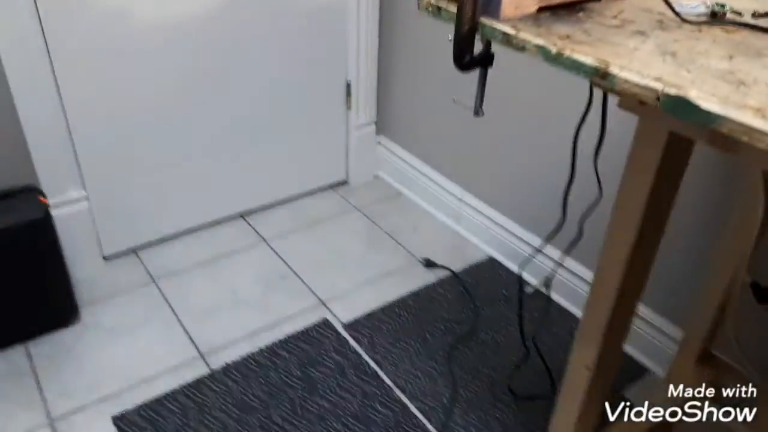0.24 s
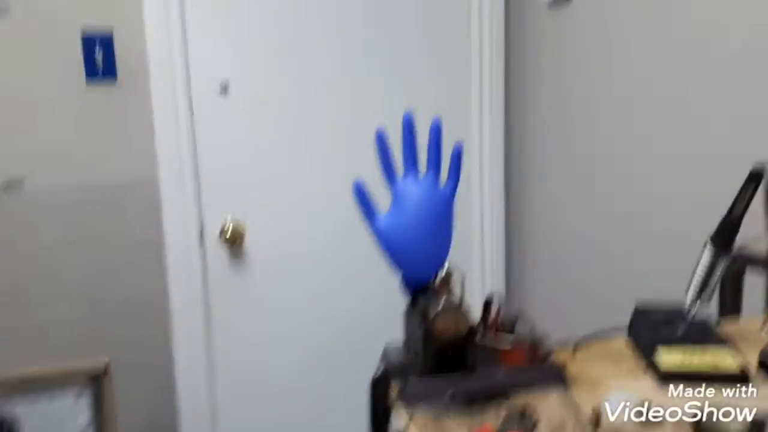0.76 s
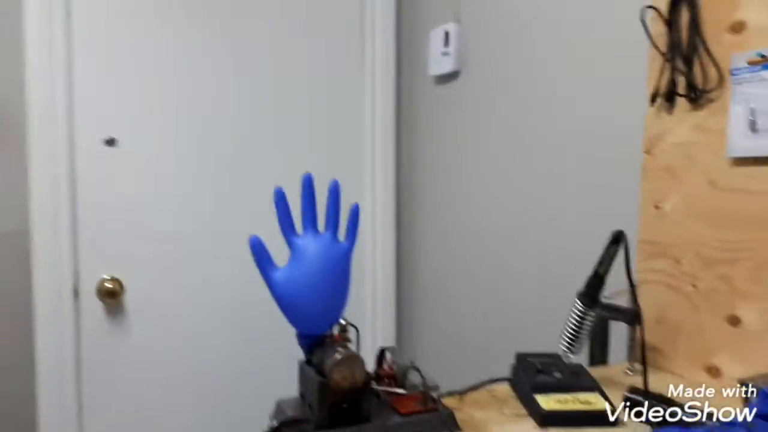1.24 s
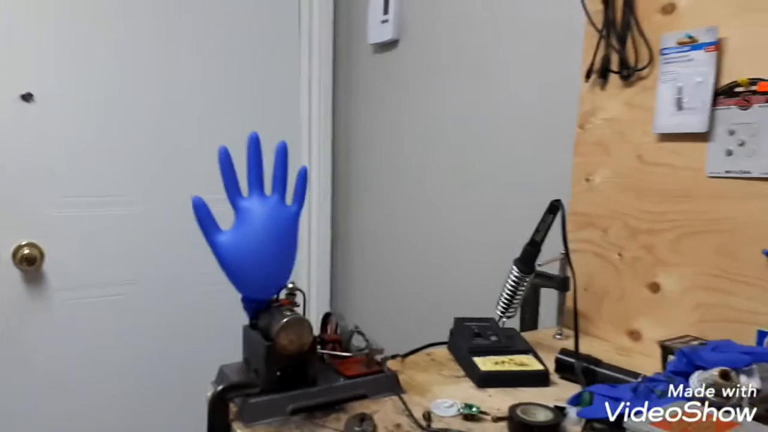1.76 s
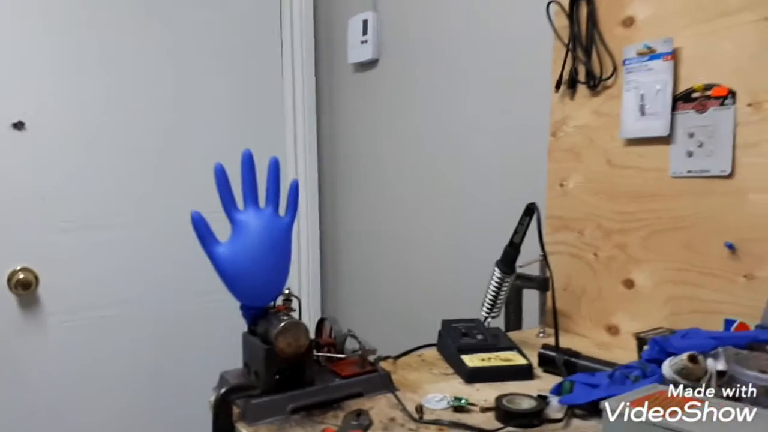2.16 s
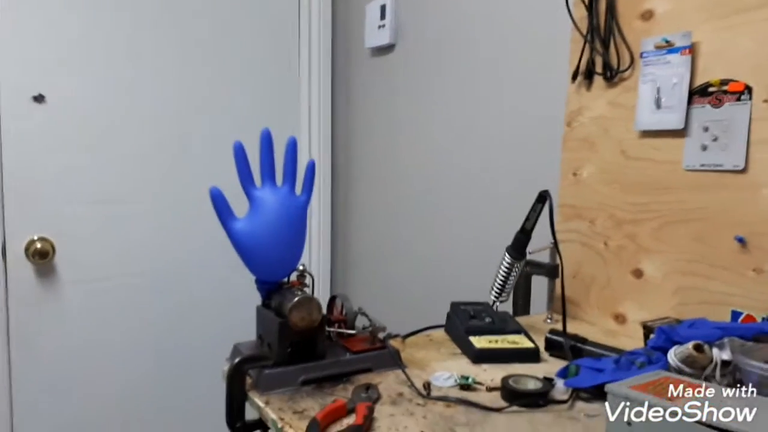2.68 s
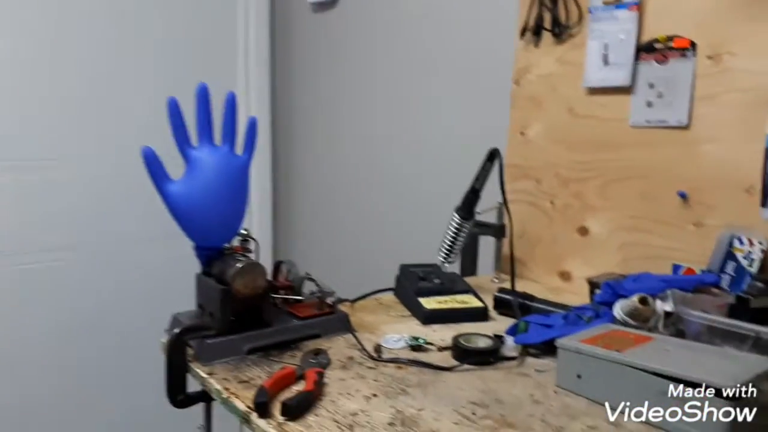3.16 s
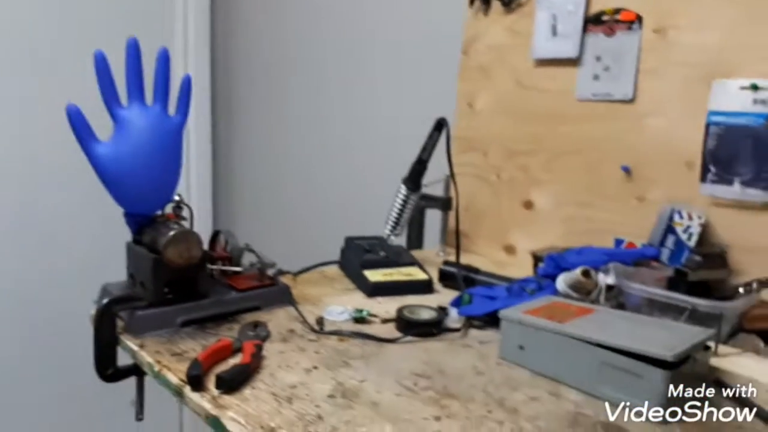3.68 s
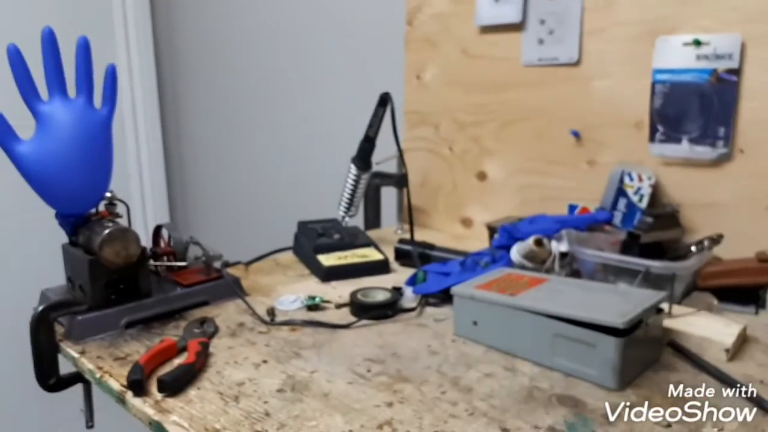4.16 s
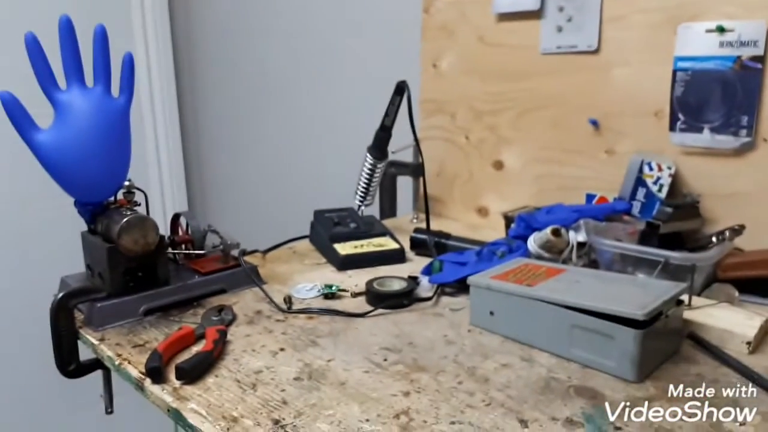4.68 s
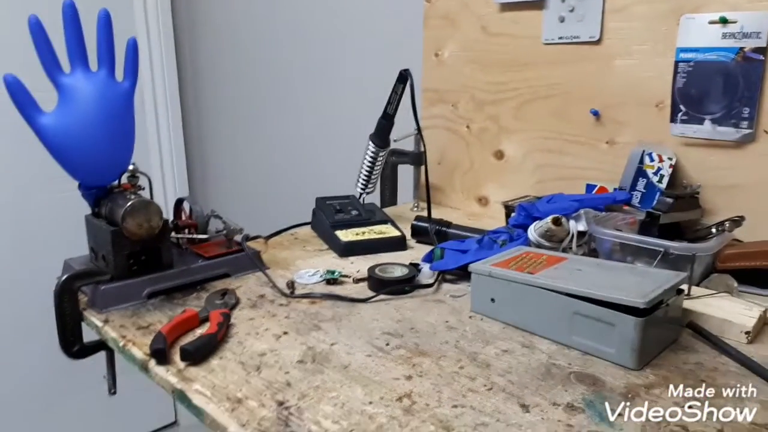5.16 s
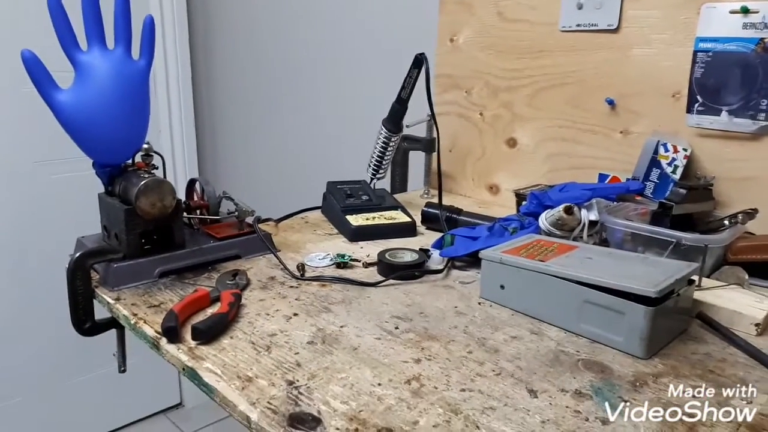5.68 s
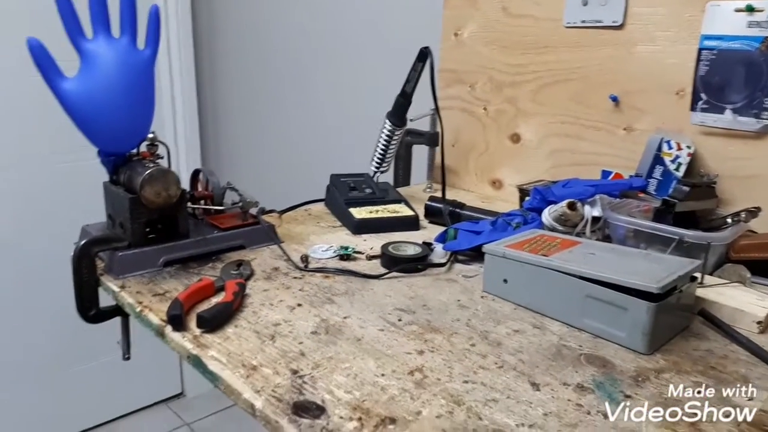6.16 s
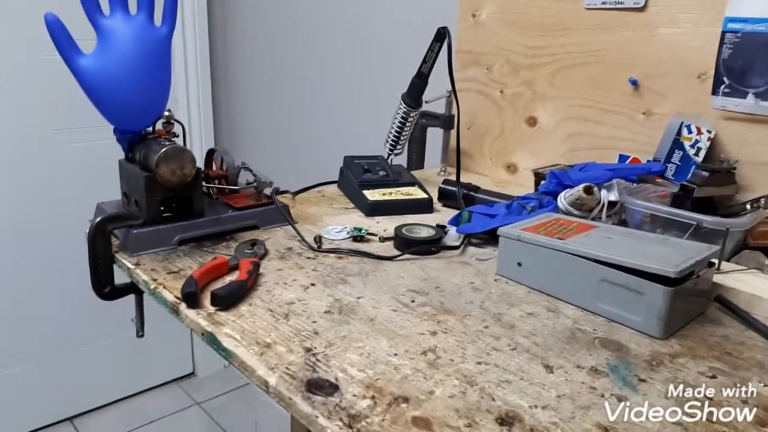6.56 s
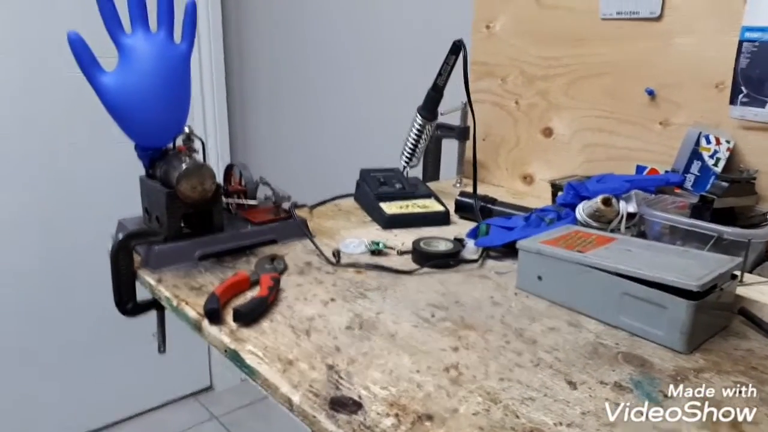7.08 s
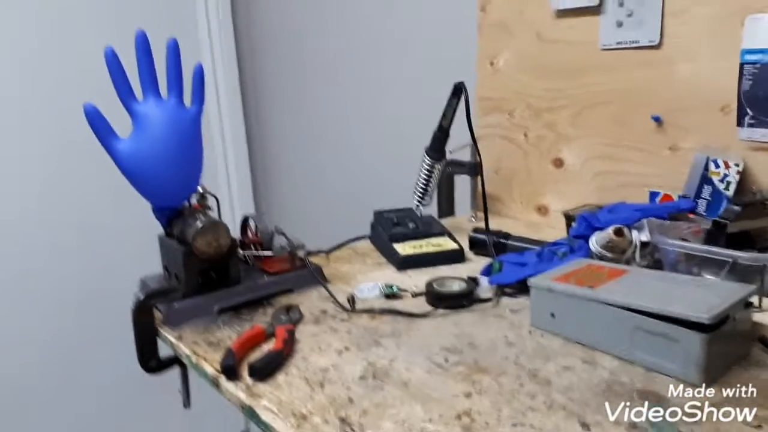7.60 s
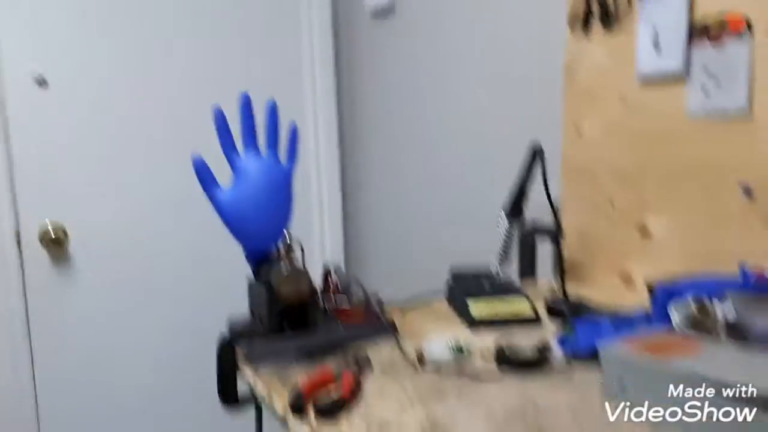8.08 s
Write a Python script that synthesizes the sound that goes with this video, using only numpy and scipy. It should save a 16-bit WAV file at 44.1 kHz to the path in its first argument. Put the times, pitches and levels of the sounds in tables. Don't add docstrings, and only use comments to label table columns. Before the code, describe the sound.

Close handheld stereo in a small workshop with a faint hum. A thin hiss stops, a tool clatters on the bench, and a flint striker rasps once with small metal ticks. After a quiet gap, gas rushes out in a bright steady hiss. Repeated strokes snap over it, one briefly puffing into flame; the torch finally lights and roars unevenly, with loud hard knocks on the bench near the end.

```python
import sys
import numpy as np
from scipy import signal
from scipy.fft import rfft, irfft, next_fast_len
from scipy.io import wavfile
from scipy.ndimage import uniform_filter1d

SR = 44100
rng = np.random.default_rng(int(sys.argv[2]) if len(sys.argv) > 2 else 0)


def ratio(d):
    e = np.asarray(d, float) / 20
    return 10 ** e


def pcm_store(signal):
    levels = np.round(np.clip(np.atleast_2d(signal), -1, 1) * 32767)
    wavfile.write(sys.argv[1], SR, levels.astype(np.int16).T)


N = 367353
LAG = 17


def rms_one(x):
    return x / np.sqrt(np.mean(np.mean(np.atleast_2d(x), axis=0) ** 2) + 1e-20)


def in_time(tables):
    rows = []
    for table in tables:
        silence = [-130] * (len(table[0]) - 1)
        rows += [[table[0][0] - .006, *silence], *table, [table[-1][0] + .006, *silence]]
    s, *columns = np.transpose(rows)
    return [np.interp(np.arange(N) / SR, s, column) for column in columns]


def ramp(span_s):
    return np.interp(np.arange(N) / SR, span_s, [0, 1])


def summed(*levels_db):
    return 10 * np.log10(sum(ratio(2 * db) for db in levels_db))


def at_hz(points, hz):
    points_hz, points_db = np.transpose(points)
    return np.interp(np.log(hz + 1), np.log(points_hz + 1), points_db)


def drift(rate_hz):
    r = np.exp(-80 * np.pi * rate_hz / SR)
    slow = signal.lfilter([1], [1, -2 * r, r * r], rng.standard_normal(N // 40 + 2002))[2000:]
    return np.interp(np.arange(N) / 40, np.arange(len(slow)), rms_one(slow))


def filtered(x, order, edges_hz, kind):
    return signal.sosfilt(signal.butter(order, edges_hz, kind, fs=SR, output="sos"), x)


def pan(left_right_db):
    return ratio([[left_right_db / 2], [-left_right_db / 2]])


def decays(times_s, gains, t60s, rises_s):
    out = np.zeros(N)
    for s, gain, t60, rise in zip(*np.broadcast_arrays(times_s, gains, t60s, rises_s)):
        at = np.arange(max(round((s - 6 * rise) * SR), 0), min(round((s + 1.5 * t60) * SR), N))
        t = at / SR - s
        swell = np.exp(np.minimum(t, 0) / max(rise, 1e-4))
        out[at] += (gain * np.where(t < 0, swell, ratio(-60 * t / t60))) ** 2
    return np.sqrt(out)


def clicks_at(times_s, gains):
    out = np.zeros(N)
    np.add.at(out, np.round(np.asarray(times_s) * SR).astype(int), gains)
    return out


def ring(clicks, hz, t60):
    r, w = ratio(-60 / (t60 * SR)), 2 * np.pi * hz / SR
    return signal.lfilter([0, np.sin(w)], [1, -2 * r * np.cos(w), r * r], clicks + 1e-18)


def heard(spectrum, ports, alike, grain_db=0.0, peaks=(), split_hz=(), same_hz=400, echo_s=.1, order=12):
    size = next_fast_len(N // 2 + 1)
    hz = np.arange(size // 2 + 1) * SR / size
    noise = rng.standard_normal(size)
    source = rfft(noise * ratio(grain_db * np.minimum(rng.exponential(1, size), 5)))

    echoes = rng.standard_normal((2, SR // 4)) * ratio(-60 * np.arange(SR // 4) / SR / echo_s)
    echoes = rfft(echoes / np.sqrt(np.sum(echoes ** 2, axis=1, keepdims=True)), size)
    still = .3 + .2 / (1 + (hz / 1500) ** 2)
    blur = np.exp(2j * np.pi * rng.random((2, len(hz))))
    echoes = np.sqrt(still) * echoes + np.sqrt(1 - still) * blur

    share = np.clip(alike + (1 - alike) / (1 + (hz / same_hz) ** 2), 0, 1)
    late = np.exp(-2j * np.pi * hz * LAG / SR / (1 + (500 / (hz + 1)) ** 2))
    direct = np.array([late, np.ones(len(hz))])

    tilt_db = at_hz(ports, hz) / 2
    colour_db = at_hz(spectrum, hz)
    for centre_hz, width_hz, db in peaks:
        colour_db = colour_db + db / (1 + (2 * (hz - centre_hz) / width_hz) ** 2)
    colour = (hz > spectrum[0][0]) * ratio(colour_db + np.array([tilt_db, -tilt_db]))
    colour = colour / np.hypot(ratio(tilt_db), ratio(-tilt_db))

    pair = source * colour * (np.sqrt(share) * direct + np.sqrt(1 - share) * echoes)
    below = [0] + [1 / (1 + (hz / edge) ** order) for edge in split_hz] + [1]
    bands = [rms_one(irfft(pair * (high - low), size)) for low, high in zip(below, below[1:])]
    return [np.tile(band, 2)[:, :N] for band in bands]


# catch in s, peak in s, peak in dB, dying in dB per s.
WHOOMPS = [
    (4.602, 4.673, -22, 297),
    (6.658, 6.67, -25, 348),
    (7.803, 8.7, -39, 147),
]


def whoomps_db():
    bursts_db = []
    for catch, peak, db, dying in WHOOMPS:
        held = peak + 0.21 * (peak - catch)
        points = [(catch - 0.016, db - 44), (catch, db - 9), (peak, db), (held, db), (held + 50 / dying, db - 64)]
        bursts_db += in_time([points])
    return summed(*bursts_db)


# time in s, flow in dB.
LEAK_FLOW = [(0.0, -59), (0.03, -58), (0.17, -62.5), (0.33, -62)]
GAS_FLOW = [(3.57, -100), (3.619, -66), (3.71, -45.5), (3.8, -48), (3.9, -43), (4.1, -41), (4.3, -40),
            (4.801, -39.5), (5.48, -39.5), (5.76, -40.5), (6.0, -43), (6.53, -44.5), (6.66, -42)]
# time in s, flow in dB, top in dB against it as the nozzle turns away.
LIT_FLOW = [(6.66, -41, -4), (6.8, -47.5, -0.5), (7.1, -45, 0.5), (7.4, -43, -4), (7.55, -48.5, 0.5),
            (7.79, -48, -6.5), (8.07, -49, -6), (8.33, -52.5, 2)]
# frequency in Hz, level in dB per Hz.
LEAK_JET = [(1530, -69), (2600, -32), (3600, -24), (4300, -2), (4940, -10), (6220, -9), (6780, 3),
            (7100, 7.5), (8680, -20.5), (12700, -7.5), (14100, -30), (16000, -24), (16500, -51)]
COLD_JET = [(1530, -59), (2600, -25.5), (3130, -20.5), (3430, -20.5), (4260, -8.5), (5010, -6.5),
            (5590, -14.0), (5990, -12.0), (7210, 2.0), (8610, -23.5), (12400, -7.5), (13800, -21.0),
            (15200, -16.0), (16100, -29.5), (16500, -37.0)][1:]
LIT_JET = [(2060, -63.5), (3500, -16), (3900, -10), (4200, -4), (4930, 0.5), (5650, -8), (6030, -4.5),
           (6870, -1), (8230, -14), (9130, -7.5), (10400, -18), (11500, -8), (12400, -8.5), (15600, -17.5),
           (16200, -24), (16500, -44.5)]
# frequency in Hz, width in Hz, level in dB.
WHISTLES = [(4395, 89, 7), (12900, 300, 4.5)]
# level in dB at full flow, share of the flow's swing.
LEAK_RIDGES = [
    (-49, 0.76),
    (-41.5, 1.12),
]
RIDGES = [
    (-48, 0.6),
    (-42, 1.2),
    (-46, 0.84),
]
# frequency in Hz, left-right in dB.
PORTS_NEAR = [(60, -1.0), (99, 1.0), (160, 3.5), (270, 1.5), (450, 5), (740, 18.5), (1220, -12.5),
              (2010, 28), (3330, -3.5), (5500, 11), (9080, -2.5), (15000, -24)]


def gas_jet():
    leak = heard(LEAK_JET, PORTS_NEAR, alike=0.17, peaks=[(4000, 640, 3.4)], split_hz=[5800])
    cold = heard(COLD_JET, PORTS_NEAR, alike=0.17, grain_db=3.0, peaks=WHISTLES, split_hz=[5800, 9000])
    lit = heard(LIT_JET, PORTS_NEAR, alike=0.083, grain_db=-3.5, peaks=[(4910, 300, 3.1)], split_hz=[8500])
    full_flow_db, lit_puff_db = -40, -12
    swing_db = in_time([LEAK_FLOW, GAS_FLOW])[0] - full_flow_db
    wide = ramp((3.78, 4.09))
    flowing = swing_db > -60
    gains = [np.sqrt(1 - wide) * flowing * ratio(db + share * swing_db) for db, share in LEAK_RIDGES]
    gains += [np.sqrt(wide) * flowing * ratio(db + share * swing_db) for db, share in RIDGES]
    lit_db, turned_db = in_time([LIT_FLOW])
    gains += [ratio(summed(lit_db, whoomps_db() + lit_puff_db)), ratio(lit_db + turned_db)]
    flutter_db = 0.33 * drift(6.0) + 0.2 * drift(60.0)
    parts = [gain * ratio(1.5 * drift(14.3)) * part for part, gain in zip(leak + cold + lit, gains)]
    return ratio(flutter_db) * sum(parts)


# time in s, roar in dB.
BURN = [(6.7, -37.5), (6.87, -44.5), (7.05, -38), (7.4, -39), (7.7, -41), (7.95, -46), (8.24, -43.5),
        (8.33, -42.5)]
# frequency in Hz, level in dB per Hz.
ROAR = [(24, -58.5), (40, -37), (120, -8), (194, -6), (264, -13.5), (320, -7.5), (420, -10), (490, -13.5),
        (539, -15), (582, -8.5), (808, -15.5), (980, -9), (1310, -19), (2040, -20), (3080, -21.5),
        (3350, -25.5), (5200, -31.5), (6500, -40), (8800, -70.5)]
# frequency in Hz, width in Hz, level in dB.
ROOM_MODES = [(134, 41, -2), (312, 40, 7), (398.6, 6.9, 8), (476, 7.3, 7.5), (599, 4.3, 5), (731, 11, 7.5),
              (782, 18, 5.5), (832, 16, 4.5), (920, 13, 6), (1040, 22, 4), (1170, 10, 6.5),
              (1284, 3.3, 11.5), (1410, 15, 3), (1780, 8.8, 10.5), (1950, 11, 2)]
# frequency in Hz, level in dB, t60 in s.
AFTER_RING = [(336.02, -59, .08), (468, -58.5, .08), (1190, -64, 0.089), (1430, -61, .12)]
# frequency in Hz, left-right in dB.
PORTS_FAR = [(60, -8), (110, -5), (200, -3), (380, -1.5), (700, -2.5), (1290, 0.5), (2380, 0), (4400, 9),
             (8120, 10), (15000, -10.5)]


def flame():
    burst_db = whoomps_db()
    level_db = summed(*in_time([BURN]), burst_db)
    upper_db = -7.5 - 0.032 * np.maximum(level_db + 36, -12) + 1.4 * drift(14.0)
    flicker_db = 2.0 * drift(39.0)
    low, upper, blaze = heard(ROAR, PORTS_FAR, alike=0.56, peaks=ROOM_MODES, split_hz=[1300, 3250])
    roar = ratio(level_db - 2.0) * (low * ratio(flicker_db) + upper * ratio(upper_db + 0.2 * flicker_db))
    blaze = blaze * ratio(burst_db - 19.5)
    whoomp_end_s = 4.752
    puff = rng.standard_normal((2, N)) * decays([whoomp_end_s], .1, .45, .02)
    tones = sum(ratio(db) * ring(puff, hz, t60) for hz, db, t60 in AFTER_RING)
    return roar + blaze + tones * ratio(5.3 * drift(26.0))


# snap in s, peak in dB, swell in s, tail t60 in s, tail in dB.
STROKES = [
    (2.505, -16.5, 0.0092, 0.16, 0),
    (4.1369, -16.5, 0.0099, 0.19, -8),
    (4.5909, -13, 0.0078, 0.43, -10),
    (5.2836, -14.5, 0.0082, 0.17, -3.5),
    (5.8235, -18.5, 0.025, 0.12, -2),
    (6.31, -15.5, 0.011, 0.18, -7.5),
]
# time in s, peak in dB, t60 in s, room tail in dB.
TICKS = [(2.445, -41, 0.0093, -23), (2.4857, -30, 0.005, -28), (2.5824, -34, 0.0081, -29),
         (2.6095, -25, 0.01, -37), (2.6247, -41, 0.017, -24.5), (2.7317, -53.5, 0.016, -31),
         (2.799, -55, 0.016, -26), (2.829, -41, 0.018, -32), (2.8856, -41.5, 0.021, -25),
         (3.019, -67, 0.015, -11), (3.0926, -58, 0.015, -17.5), (4.109, -15, 0.0086, -28),
         (4.154, -20, 0.0085, -42), (5.8444, -10, 0.0035, -34), (8.031, -28, 0.014, -17)]
# frequency in Hz, level in dB per Hz.
FLINT = [(240, -25.5), (400, -29), (745, -34.5), (1080, -17.5), (1250, -18), (1870, -16), (2800, -12.5),
         (4000, -10), (5540, -4.5), (6090, -3.5), (6790, 4.5), (8310, -10), (14800, -6.5), (15700, -21.5),
         (16500, -37.5)]
# frequency in Hz, width in Hz, level in dB, left-right in dB.
STEEL = [(3030, 3500, -26.5, 4), (5030, 430, -36.5, 0.5), (6740, 1100, -5.5, 12), (11000, 1700, -29, -6),
         (11900, 400, -22.5, -2), (14600, 2000, -11.5, 1)]


def striker():
    s, peak_db, swell, t60, tail_db = np.transpose(STROKES)
    dull, bright = heard(FLINT, PORTS_NEAR, alike=0.049, grain_db=1.0, split_hz=[2200], order=24)
    gain = ratio(peak_db - 8.0)
    strokes = decays(s + .002, ratio(peak_db - 0.5), .012, .0012)
    strokes += decays(s, gain * ratio(tail_db - 3.5), .006, swell)
    strokes += decays(s + 0.0092, gain * ratio(tail_db), t60, .003)

    tick_s, tick_db, tick_t60, room_db = np.transpose(TICKS)
    ticks = decays(tick_s, ratio(tick_db - 10.5), tick_t60, .0002)
    ticks += decays(tick_s + 0.0083, ratio(tick_db + room_db), .2, .001)

    blows = clicks_at(np.r_[s + .0018, tick_s], ratio(np.r_[peak_db - 3, tick_db - 4]))
    steel = sum(ring(blows, hz, 0.77 / width) * ratio(db) * pan(pan_db) for hz, width, db, pan_db in STEEL)
    steel = filtered(steel, 8, 2150, "high")
    rasp = filtered(bright * (strokes + ticks), 8, 2100, "high")
    rattle = decays(s + .016, gain * ratio(-31.5), .6 * t60, .004) + ratio(-30.5) * ticks
    rattle = dull * ratio(2.9 * drift(70.0)) * rattle
    return rasp + rattle + [np.roll(steel[0], LAG), steel[1]]


# time in s, peak in dB, t60 in s, brightness in dB, crack in dB.
KNOCKS = [(0.649, -19, 0.22, -5.5, 0), (0.659, -21, 0.27, -11, -24.5), (0.747, -25, 0.47, -6, -1),
          (0.773, -20.5, 0.22, -2, -26), (0.794, -19, 0.12, -4, -17.5), (0.841, -12, 0.29, -6, -11.5),
          (0.891, -21.5, 0.2, -7, -24), (0.926, -30, 0.28, -4.5, -25), (7.409, -11, 0.24, 6, -14),
          (7.424, -5.5, 0.21, -0.5, -23), (7.453, -12.5, 0.09, -23, -12), (7.483, -13.5, 0.2, -27, -17),
          (7.521, -13, 0.13, -14, -13), (7.533, -17, 0.16, -4.5, -10), (7.557, -16, 0.25, -18, -12),
          (7.576, -18, 0.3, -17, -12), (7.61, -19.5, 0.16, -12, -7)]
# frequency in Hz, level in dB per Hz.
BENCH = [(59, -45.5), (100, -19.5), (208, -7), (408, 0.5), (624, -1), (756, 1), (1050, 3), (1450, -2),
         (2600, -12), (3270, -14), (5000, -15), (5940, -21), (7070, -17), (8410, -44.5), (10500, -39),
         (13500, -46.5), (22000, -120)]
# frequency in Hz, level in dB, t60 in s.
BENCH_MODES = [(332, -6.5, 0.2697), (412.7, -7, 0.16), (475, -4.5, 0.24), (670, 2.5, 0.12),
               (790, -5, 0.088), (910, -38.5, 1.8), (1080, -16, 0.38), (1500, -4.5, 0.07), (1500, -19, 0.2),
               (1730, -17, 0.14), (1900, -13, 0.27), (2245, -23.5, 0.17)]
# from s, to s, damping in dB per s.
HAND_STOPS = [
    (0.962, 1.4, 292),
    (7.683, 8.2, 144),
]


def knocks():
    s, peak_db, t60, bright_db, crack_db = np.transpose(KNOCKS)
    rise_s, hard_knock_db = 0.00042, -14
    body, clack = heard(BENCH, PORTS_FAR, alike=0.35, same_hz=800, peaks=ROOM_MODES, grain_db=3.0,
                        split_hz=[2600], order=3)
    body = body * decays(s + 0.0016, ratio(peak_db - 11.5), t60, rise_s)
    clack = clack * decays(s, ratio(peak_db - 15 + bright_db), 0.74 * t60, rise_s)

    strengths_db = rng.normal(0, 9.7, (len(s), len(BENCH_MODES)))
    modes = 0
    for (hz, level_db, mode_t60), chance_db in zip(BENCH_MODES, strengths_db.T):
        blows = clicks_at(s, ratio(peak_db + level_db - 31.5 + chance_db))
        modes = modes + ring(blows, hz, min(mode_t60, .16))
    softness_db = 1.2 * np.minimum(peak_db - hard_knock_db, 0)
    cracks = clicks_at(s + 0.001, ratio(peak_db + crack_db + 11.5 + softness_db))
    modes = modes + filtered(cracks + 1e-18, 2, [700, 6500], "band")

    t = np.arange(N) / SR
    damped_db = sum(-slope * (t - start) * (t > start) * (t < end) for start, end, slope in HAND_STOPS)
    return ratio(1.4 * drift(90.0) + damped_db) * (body + clack) + [np.roll(modes, LAG), modes]


# time in s, level in dB, brightness in dB per octave.
CONTACTS = [(0.65, -18, -5), (0.656, -33, -2), (0.749, -35, 5), (0.8411, -6, 0.5), (0.844, -9.5, 0),
            (0.847, -19, -3), (0.866, -21.5, -4), (0.879, -32, 5.5), (7.409, -11, -3), (7.414, -17, 6),
            (7.4183, -17, -4), (7.422, -12, 4), (7.4328, -8, -2), (7.455, -14, -2), (7.485, -18, -8),
            (7.522, -20, -9), (7.533, -18, 0.5), (7.558, -15, -4), (7.662, -27, -2)]
# frequency in Hz, width in Hz, level in dB.
CRACK = [(895, 500, -1), (2600, 820, -3), (3200, 660, -5.5), (4793, 830, -9), (7000, 1200, -14)]


def contacts():
    s, db, tilt_db = np.transpose(CONTACTS)
    out = 0
    for k, (hz, width, level_db) in enumerate(CRACK):
        blows = clicks_at(s, ratio(db + level_db + tilt_db * np.log2(hz / 900)))
        out = out + (-1) ** k * ring(blows, hz, 1.9 / width)
    out = filtered(out, 3, [350, 8000], "band")
    return np.array([np.roll(out, LAG), out])


# time in s, peak in dB, frequency in
# Hz, t60 in s, left-right in dB.
BUMPS = [(0.103, -34.5, 149.7, 0.0029, 1), (0.276, -35, 138, 0.017, -23.5),
         (2.505, -21.5, 124, 0.014, -16.5), (3.714, -57, 334, 0.052, -1), (3.898, -61, 322, 0.057, -1),
         (4.143, -50.5, 149, 0.027, -10), (4.65, -38.5, 95, .2, -2.5)]


def bumps():
    out = 0
    for s, peak_db, hz, t60, pan_db in BUMPS:
        push = clicks_at([s], ratio(peak_db + 4.0))
        swing = ring(push, hz, t60) + ratio(-13.0) * ring(push, 4.1 * hz, 0.38 * t60)
        out = out + swing * pan(pan_db)
    return filtered(out, 3, [45, 950], "band")


# time in s, swell and fade in s, frequency in Hz, width in Hz, level in dB.
SWISHES = [(1.3, 0.052, 800, 140, -77), (1.4, .1, 500, 51, -75), (1.47, .02, 5300, 790, -66.5),
           (1.61, 0.037, 4830, 250, -70.5), (2.831, 0.003, 5100, 500, -63.5),
           (2.885, 0.0031, 4400, 300, -59), (2.9, 0.019, 3800, 1190, -76), (3.11, 0.024, 5500, 1500, -76.5),
           (3.3, 0.07, 4500, 1200, -81.5), (6.335, 0.0094, 1300, 500, -66.5), (6.6, 0.022, 450, 200, -63.5),
           (4.93, 0.031, 1449, 60, -70), (0.77, 0.018, 4100, 310, -42.5), (0.67, 0.0086, 2000, 1200, -38),
           (0.31, .003, 1400, 1500, -55), (2.95, 0.028, 4000, 400, -77), (3.16, 0.017, 4900, 500, -74.5),
           (0.78, 0.043, 150, 54, -52), (5.85, 0.011, 1800, 1400, -57.5)]
# frequency in Hz, level in dB.
FAINT_TONES = [(330, -80), (480, -82.5), (700, -85.5), (850, -82), (1200, -89.5), (1500, -88), (1850, -92)]


def swishes():
    out, white = np.zeros((2, N)), rng.standard_normal((2, N))
    for s, length, hz, width, db in SWISHES:
        at = slice(round((s - 5 * length) * SR), round((s + 9 * length) * SR))
        narrow = ring(ring(white[:, at], hz, 1.4 / width), hz, 1.4 / width)
        out[:, at] += rms_one(narrow) * decays([s], ratio(db), 8.0 * length, length)[at]
    tones_s, rarity = (3.9, 7.8), 1.3
    at = slice(*[round(s * SR) for s in tones_s])
    for hz, db in FAINT_TONES:
        tone = ratio(db) * rms_one(ring(white[:, at], hz, 0.16))
        out[:, at] += tone * np.clip(2 * (drift(6.5)[at] - rarity), 0, 1)
    return out


# time in s, level in dB.
NEARNESS = [(0.0, 4.5), (0.33, 7), (0.4, 2), (1.1, 2), (1.7, 1.5), (2.5, 0.5), (2.75, -4.5), (3.6, -5),
            (3.8, 2), (6.6, -0.5), (6.85, 2.5), (8.33, 0)]
# frequency in Hz, level in dB per Hz.
LOW_AIR = [(120, -31), (200, 0.5), (354, -0.5), (494, -1.0), (676, -7.0), (798, -4.0), (978, -9.0),
           (3370, -15), (4780, -11.5), (5860, -8.0), (6790, -3.0), (9120, -18), (12300, -13.5),
           (15000, -26), (16500, -29)][1:]
# time in s, swell and fade in s, rustle in dB, low
# air in dB.
MOVES = [(0.02, 0.032, -59, -74), (0.099, 0.014, -75, -72), (0.332, 0.007, -47, -51),
         (0.596, 0.035, -65.5, -62.5), (1.251, 0.037, -68.5, -80.5), (1.465, 0.022, -61, -76.5),
         (1.36, .08, -77, -74.5), (1.58, 0.09, -71.5, -78.5), (3.22, .07, -81, -72.5),
         (4.41, 0.011, -88.5, -81), (5.59, 0.011, -90.5, -70), (1.95, 0.038, -72.5, -97),
         (2.43, 0.059, -68.5, -85), (2.89, 0.017, -74.5, -93), (3.1, 0.054, -78, -96.5),
         (2.55, 0.024, -90.5, -62.5), (3.73, 0.12, -90.5, -71.5), (5.85, 0.0069, -89, -62),
         (6.33, 0.0098, -91, -69.5)]


def room():
    hum_hz, hum_db, rumble_db, air_db, rustle_db = 120.7, -64, -71.5, -79.5, -79
    near_db, = in_time([NEARNESS])
    masked = ramp((3.6, 4.1))
    faint_db = near_db - 18.5 * masked - 4 * ramp((6.5, 6.6))
    s, length, move_rustle_db, move_air_db = np.transpose(MOVES)
    air_gain = ratio(air_db + faint_db + (1.5 + 2.8 * masked) * drift(8.7))
    air_gain = np.hypot(air_gain, decays(s, ratio(move_air_db), 10.0 * length, length))
    rustle_gain = ratio(rustle_db + faint_db + 2.0 * drift(3.9))
    rustle_gain = np.hypot(rustle_gain, decays(s, ratio(move_rustle_db), 7.5 * length, 0.69 * length))
    phase = 2 * np.pi * hum_hz * np.arange(N) / SR + .4 * drift(21.0)
    hum = ratio(hum_db + near_db + 1.7 * drift(14.0)) * np.sin(phase) * pan(1.6)
    rumble_spectrum = [(20, -16.0), (60, -5.0), (100, -3.0), (170, -1.5), (230, -41.0)]   # Hz, dB per Hz
    rumble, = heard(rumble_spectrum, PORTS_FAR, alike=0.42)
    air, rustle = heard(LOW_AIR, PORTS_FAR, alike=0.067, split_hz=[3200], order=6)
    rumble = rumble * ratio(rumble_db + 0.73 * near_db + 2.9 * drift(1.3))
    return hum + rumble + air_gain * air + rustle_gain * rustle


def scene():
    return room() + gas_jet() + flame() + striker() + knocks() + bumps() + contacts() + swishes()


# from s, to s, low edge in Hz, high edge in Hz, share dropped.
STARVED = [(0.658, 0.83, 8300, 16500, .5), (0.85, 0.95, 8300, 16500, .4), (2.475, 2.51, 950, 2050, .85),
           (3.8, 4.1, 300, 2600, .5), (4.2, 4.58, 250, 2400, .85), (4.79, 5.0, 1600, 2450, .7),
           (4.8, 5.0, 550, 1100, .5), (5.01, 5.27, 250, 2450, .8), (4.16, 4.2, 300, 2400, .4),
           (5.31, 5.35, 300, 2400, .4), (6.325, 6.36, 300, 1000, .8), (5.36, 5.8, 250, 2450, .85),
           (5.88, 6.3, 250, 2450, .85), (6.37, 6.63, 250, 2400, .8), (4.2, 4.58, 2600, 4000, .12),
           (4.78, 6.64, 2600, 4000, .15), (6.7, 7.4, 3150, 4150, .45), (7.62, 8.05, 3150, 4150, .35),
           (7.8, 8.3, 1400, 2100, .15)]


def starve(x):
    out, frame = x.copy(), 1536
    for start, end, low, high, share in STARVED:
        first, frames = round(start * SR) - frame, round((end - start) * SR / frame) + 2
        part = x[:, first:first + frames * frame]
        size = part.shape[1]
        spectrum, hz = rfft(part), np.arange(size // 2 + 1) * SR / size
        lift = min((1 - share) ** -.5, 1.6)
        edges = np.linspace(low, high, 2 + int((high - low) / max(170, 1 / 14 * low)))
        for a, b in zip(edges, edges[1:]):
            dropped = np.r_[0, np.where(rng.random(frames - 2) < share, 1, 1 - lift), 0]
            dropped = uniform_filter1d(np.repeat(dropped.astype(float), frame), size=frame // 5)[:size]
            out[:, first:first + size] -= dropped * irfft(spectrum * ((hz >= a) & (hz < b)), size)
    return out


def band_limit(x):
    return signal.sosfilt(signal.butter(12, 16620, fs=SR, output="sos"), x)


def record(dry):
    t, dropout_s = np.arange(N) / SR, (.337, 0.378)
    alive = np.clip(np.maximum(dropout_s[0] - t, t - dropout_s[1]) / 0.0016, 0, 1)
    dull = signal.sosfilt(signal.cheby2(12, 60, 16800, fs=SR, output="sos"), dry)
    mix = np.clip(starve(dull) * alive, -1, 1)
    return band_limit(mix)


dry = scene()
out = record(dry)
pcm_store(out)
```